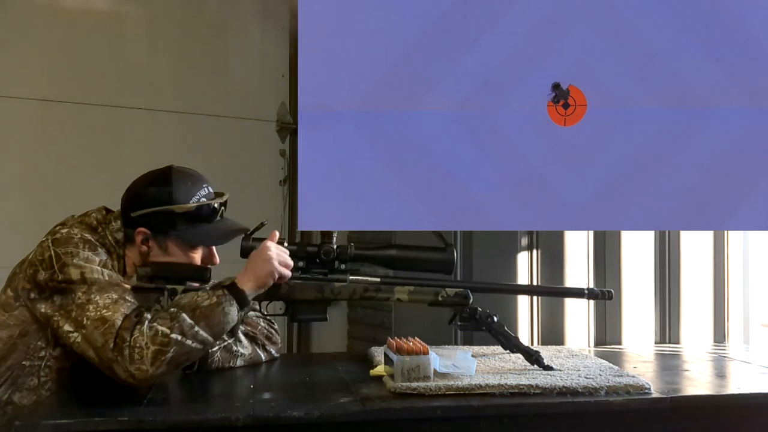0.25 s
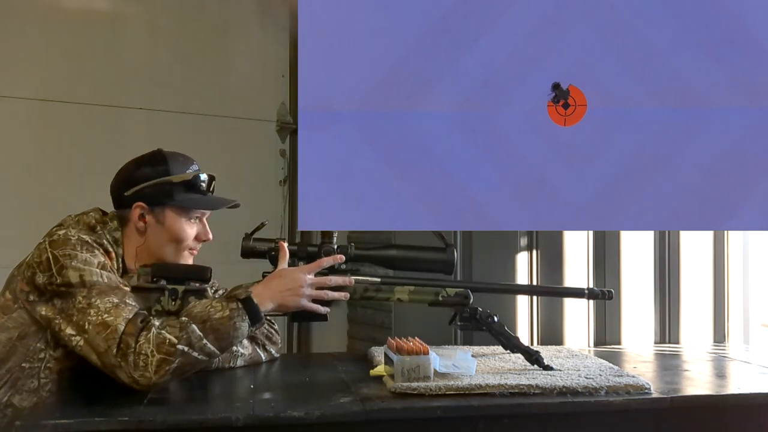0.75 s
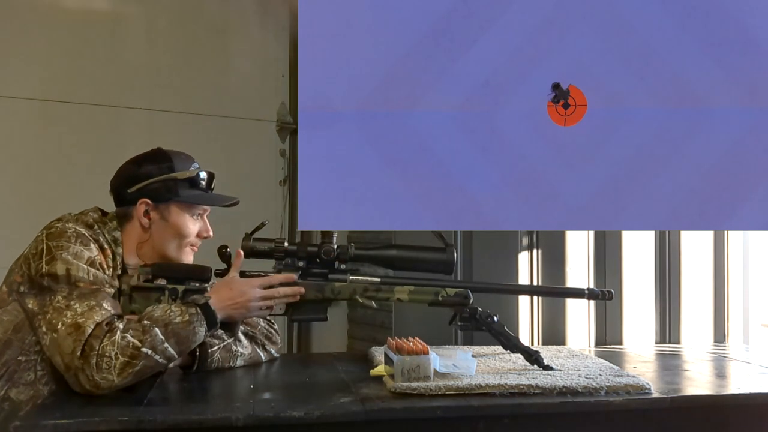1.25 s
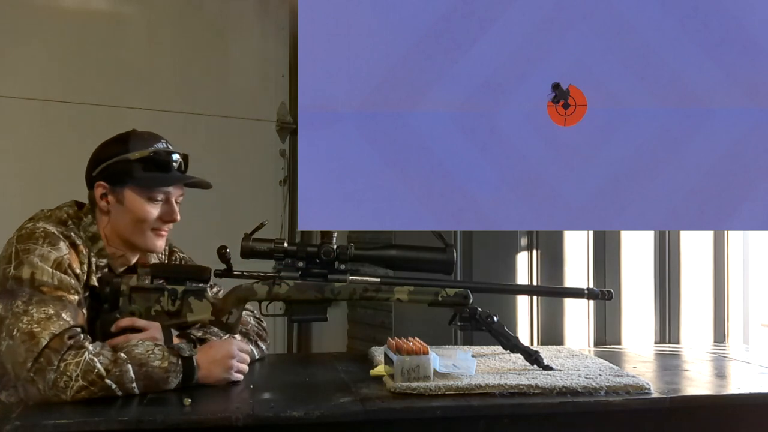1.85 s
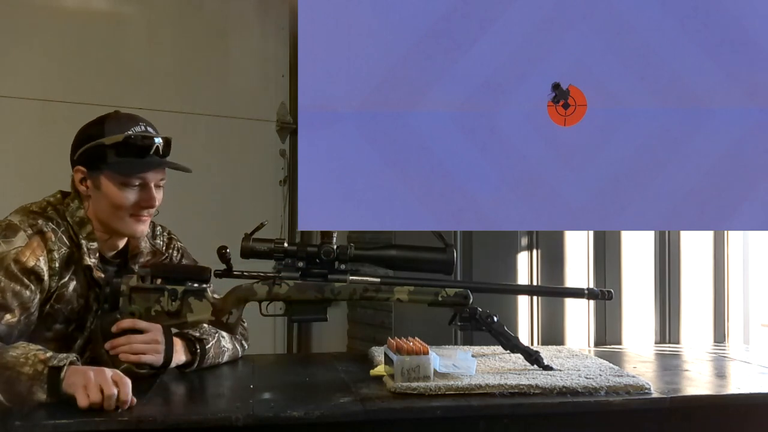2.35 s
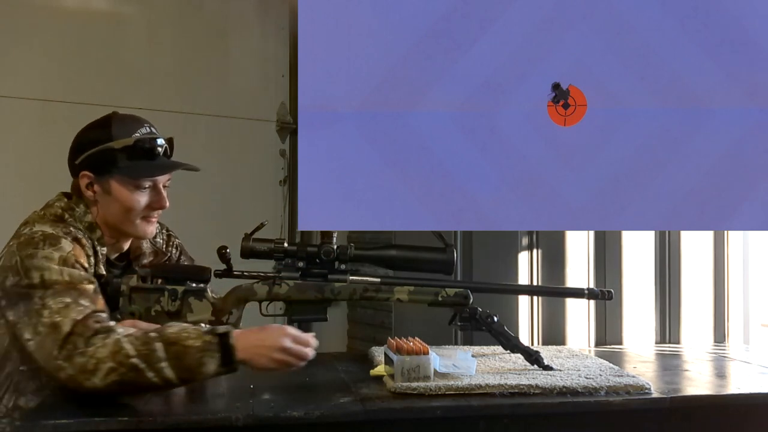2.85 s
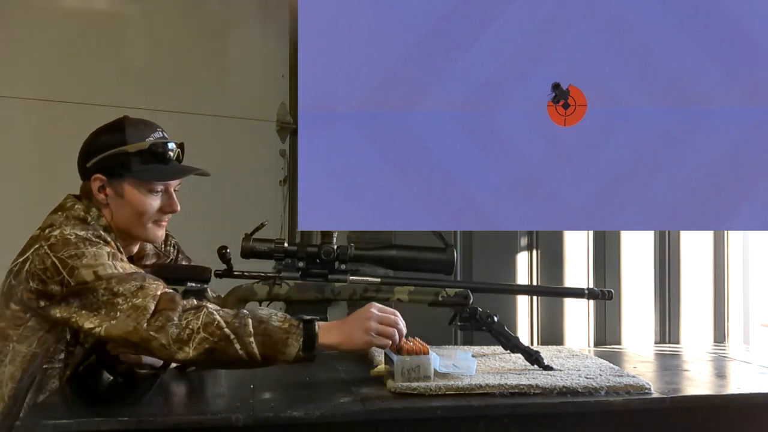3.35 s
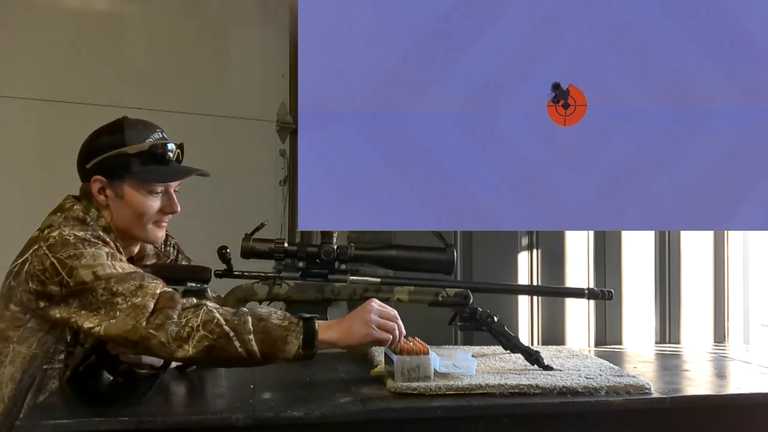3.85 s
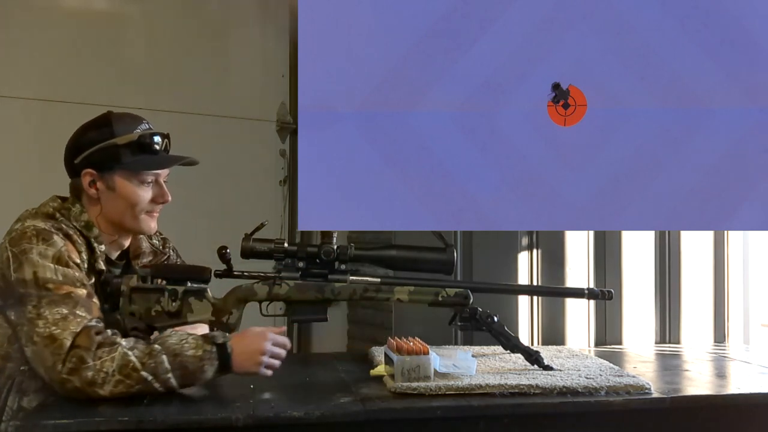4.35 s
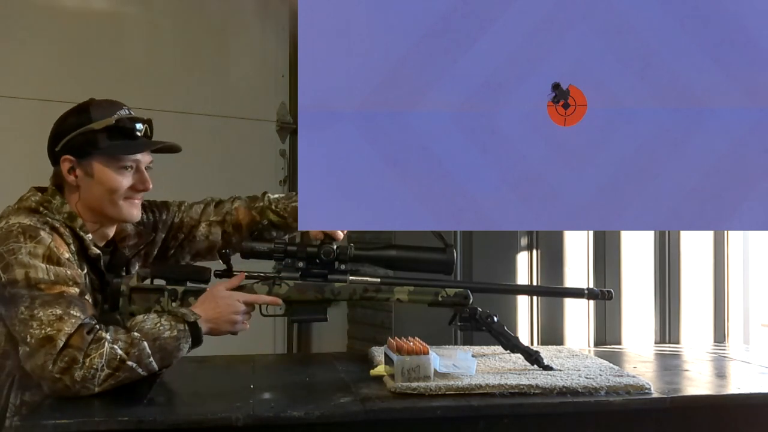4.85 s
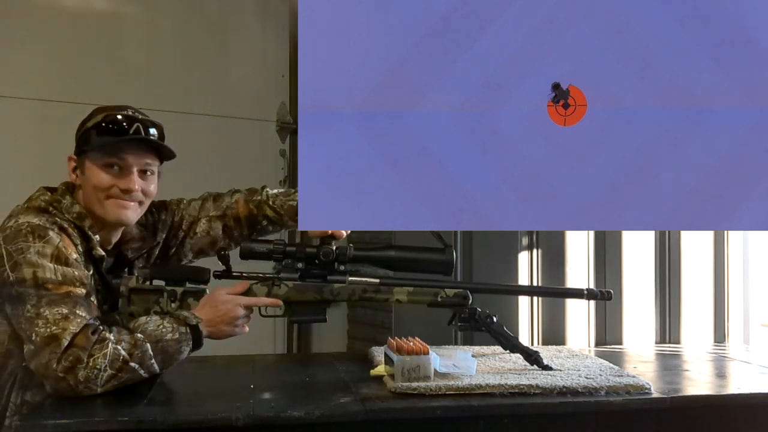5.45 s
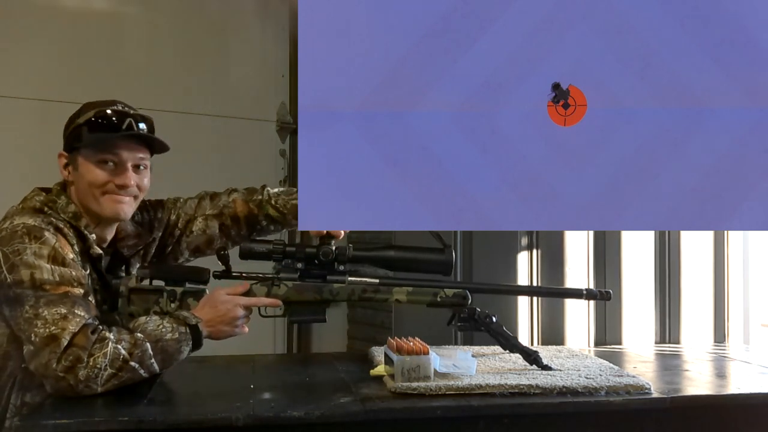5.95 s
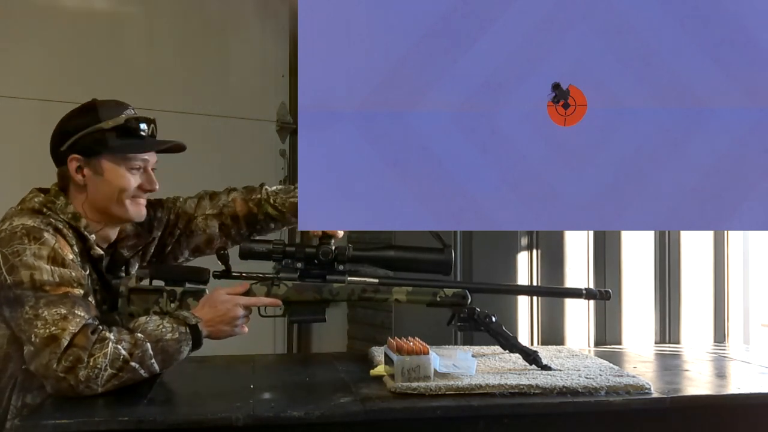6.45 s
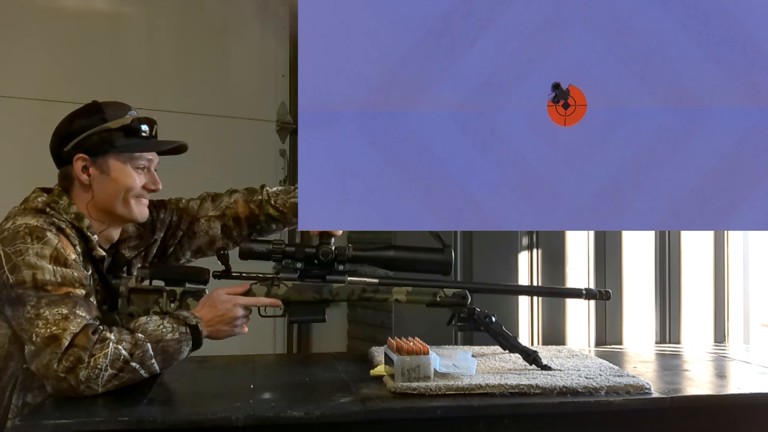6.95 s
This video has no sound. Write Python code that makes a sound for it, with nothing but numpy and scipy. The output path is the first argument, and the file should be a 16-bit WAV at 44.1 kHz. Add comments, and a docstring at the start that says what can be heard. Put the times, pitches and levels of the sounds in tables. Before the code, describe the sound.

A rifle shot's echo fades over a covered range, the bolt clacks back hard, and a spent brass case drops, bounces and rolls on the bench.

```python
"""First the echo of a rifle shot rolls away over a covered shooting range while the shelter's panels ring.
The bolt is lifted and pulled back against its stop, where it rebounds: steel, stock and bench ring at each blow.
The spent case lands on the bench, bounces and rolls: ringing brass, thuds, scuffs and a rain of tiny ticks.
Later cartridges rattle in their box, a scope dial turns click by click, and hands, arms and a sleeve rub and bump.
Hard walls add fading reflections made from noise, over quiet, still air."""
import sys
import numpy as np
from scipy import signal
from scipy.fft import rfft, irfft
from scipy.io import wavfile
from scipy.ndimage import uniform_filter1d

SR = 44100
rng = np.random.default_rng(int(sys.argv[2]) if len(sys.argv) > 2 else 0)


def store_pcm(level_fs):
    """Save levels as 16-bit WAV."""
    pcm = np.round(np.clip(level_fs, -1, 1) * 32767).astype(np.int16)
    wavfile.write(sys.argv[1], SR, np.atleast_2d(pcm).T)


N = 317074
T = np.arange(N) / SR  # time of each sample [s]
BLOW_SAMPLES = SR / 50  # 20 ms, the common yardstick for the energy of short sounds

# blows of the bolt; the steel rings first and the stock answers after a lag:
# (time [s], contact [s], steel level [dB], steel pitch ratio, crack level [dB],
#  stock lag [s], stock level [dB], stock pitch ratio, thud level [dB])
BOLT_BLOWS = [(.119, .014, -56, .93, -86.5, 0.0088, -41.5, 0.83, -65),
              (.362, .012, -46, 0.98, -56.5, .011, -38, 0.89, -48.5),
              (.425, .02, -60.5, 1.12, -80.5, 0.0045, -47.5, 0.62, -54.5),
              (.686, .009, -52.5, 0.9, -92.5, .006, -51, 0.97, -79),
              (1.198, .005, -36, 0.87, -42, .0005, -26, 0.88, -41.5),
              (1.2025, .012, -48.5, 1.1, -49.5, .0005, -20.5, 1.02, -41),
              (1.4195, .0055, -33, 1.01, -54, .002, -40.5, 0.81, -59.5)]
# ringing tones of the rifle stock: (frequency [Hz], level [dB], time to fall 60 dB [s])
STOCK_MODES = [(388, -17.5, 0.21), (614, -14.5, 0.085), (664, -2, 0.089), (728, -11.5, 0.11),
               (848.4, -9.5, 0.029), (940, -18, 0.16), (1470, -32.5, 0.059)]
# ringing tones of the bolt steel: (frequency [Hz], level [dB], time to fall 60 dB [s])
STEEL_MODES = [(1105, -2.5, 0.023), (1500, -10.5, .025), (1508, -3, 0.11), (1733.5, 2.5, .03),
               (1763, -7.5, .03), (2000, -11, .03), (2380, -22, .02)]
# colour of the hardest crack: (frequency [Hz], level [dB])
CRACK_COLOUR = [(120, -36.5), (500, -8.5), (1200, 11), (2200, 5), (2900, -2), (4300, -3.5), (4900, -13),
                (6000, -8), (7000, -6), (7700, -14), (9500, -21.5), (11000, -17), (11700, -59)]
# colour of a thud through the bench: (frequency [Hz], level [dB])
THUD_COLOUR = [(25, -30), (60, -23.5), (95, -12.5), (142, 1), (200, -5.5), (280, -6), (450, -20.5),
               (900, -36), (3000, -97.5)]
# colour of the bolt scraping back: (frequency [Hz], level [dB])
SLIDE_COLOUR = [(60, -11.5), (150, 7), (230, -7), (400, -11.5), (620, 5), (900, -3.5), (1250, -13),
                (1700, -2), (2400, -22.5), (4200, -24), (7000, -36.5), (9000, -43), (11100, -31.5),
                (11800, -74)]

# softer blows crack more dully: dB lost per octave above the knee for each dB under the hardest blow
CRACK_KNEE_HZ, CRACK_DULLING = 5165, 0.29
# the bolt rebounds from its stop, each time sooner and weaker; levels are those of the first rebound
REBOUND_S, REBOUND_GAP_S, REBOUND_SHRINK, REBOUND_LOSS_DB = 1.221, .018, .9, 5
REBOUND_STEEL_DB, REBOUND_CRACK_DB, REBOUND_STOCK_DB, REBOUND_THUD_DB = -47, -57.5, -27.5, -36.5
# the bolt slides back in its raceway: it gathers speed, runs on and is cut short by the stop
SLIDE_DB, SLIDE_FULL_S, SLIDE_ENDS_S = -37.5, 1.158, 1.202
SLIDE_RISE_DB_PER_S, SLIDE_SAG_DB_PER_S, SLIDE_DROP_DB_PER_S = 1100.5, 130.5, 1501.5

# the case hits the bench: (time [s], level [dB], contact [s])
LANDINGS = [(1.587, -20.5, 0.013), (1.604, -29, 0.007), (1.615, -31, 0.0076), (1.652, -36.5, .012),
            (1.695, -35.5, 0.0089), (1.709, -30, 0.021), (1.772, -34, 0.016), (1.827, -33, 0.012),
            (1.891, -39, .009), (1.919, -38.5, 0.012), (1.975, -42.5, 0.035), (2.138, -53, 0.026),
            (2.217, -49, 0.0075), (2.339, -58.5, 0.011)]
# ringing tones of brass on the bench top: (frequency [Hz], level [dB], time to fall 60 dB [s])
CASE_MODES = [(240, -24, 0.059), (445.4, -2, 0.072), (526, -13.5, .07), (610, 7, 0.051), (650, -6.5, 0.067),
              (783, 3, 0.028), (1040, -1, 0.17), (1068, -3.5, 0.17), (1126, -4, 0.14), (1366, -13.5, 0.11),
              (1420, -15.5, .1), (1590, -15, 0.15), (1693, -11.5, 0.11), (2000, -21, .1),
              (2125, -18, 0.046), (2430, -31.5, .08), (2400, -31.5, .04), (3560, -41.5, .05)]
# high tones of the thin brass wall, rung by the first, hardest landing:
# (frequency [Hz], level [dB], time to fall 60 dB [s])
BRASS_WALL_MODES = [(2440, -4.5, 0.12), (2500, -4.5, .04), (3570, -13, 0.12), (3987, -11.5, .012),
                    (4623, -18.5, .07)]
BRASS_WALL_DB = -49
# the case's last rock sets the rim singing: (time [s], level [dB], frequency [Hz], length [s])
LAST_ROCK = [(2.55, -60, 1080, 0.1)]
# colour of the rolling ticks: (frequency [Hz], level [dB])
ROLL_COLOUR = [(300, -0.5), (620, 10), (800, 8.5), (1000, 6.5), (1150, 2.5), (1350, -4), (1750, -4.5),
               (2100, -20), (2600, -28), (3300, -42), (4500, -50.5), (5500, -60), (9000, -85.5)]
# the roll surges as the case swings round: (time at the top [s], gain [dB], width [s])
ROLL_SURGES = [(2.145, 5.5, 0.012), (2.205, 9.5, 0.03), (2.325, 9, 0.038), (2.609, 15.5, 0.032)]
# the ejected case scuffs out of the port: (time [s], level [dB], length [s])
EJECTION = [(1.41, -41, 0.067), (1.45, -42.5, .15)]
# colour of brass scuffing on a hard surface: (frequency [Hz], level [dB])
SCUFF_COLOUR = [(300, -9), (600, 5.5), (1000, 9.5), (1800, 4.5), (2300, -6.5), (3400, -15), (4600, -24),
                (5200, -39.5), (7000, -46.5), (12000, -85.5)]

# the bench thuds under the landings, less as the hops get lower
LANDING_THUD_DB, LANDING_THUD_FADE_DB_PER_S = -44.5, 57.5
# every landing scuffs the bench: dB against its ring, length
LANDING_SCUFF_DB, LANDING_SCUFF_S = -13, .025
# the case rolls from its first landing on, slows and comes to rest
ROLL_DB, ROLL_RISE_DB_PER_S, ROLL_SAG_DB_PER_S = -30.5, 4001, 30.5
ROLL_ENDS_S, ROLL_DROP_DB_PER_S = 2.387, 134
# the lower edge of its sound climbs as it slows, most quickly round ROLL_THINS_S
ROLL_EDGE_HZ, ROLL_LAST_EDGE_HZ, ROLL_THINS_S, ROLL_THINNING_S = 340, 1400, 2.426, 0.1

# cartridges knock in their box: (time [s], box level [dB], brass clink level [dB], bench knock level [dB])
RATTLE = [(4.119, -63.5, -63.5, -90), (4.144, -58.5, -68.5, -92), (4.1905, -49.5, -49.5, -73),
          (4.202, -46, -57, -48), (4.211, -44.5, -57.5, -47.5), (4.244, -49.5, -64, -68),
          (4.256, -46.5, -61.5, -56.5), (4.278, -50.5, -68, -54), (4.305, -50.5, -67, -61)]
# ringing tones of the cartridge box: (frequency [Hz], level [dB], time to fall 60 dB [s])
BOX_MODES = [(574, -15, 0.07), (687, 5, 0.16), (787, 16, 0.052), (863, 11.5, 0.074), (983, 10.5, 0.048),
             (1210, 9, 0.018), (1513, 0, 0.08), (1708, 0.5, 0.12), (2080, -41, .03), (2450, -23, .02)]
# colour of brass clinking on brass: (frequency [Hz], level [dB])
CLINK_COLOUR = [(300, -16), (900, 1), (1400, 3.5), (1900, 4.5), (2300, -7.5), (2700, -13.5), (3600, -23.5),
                (4500, -31), (4900, -44), (8000, -70)]
# ringing tones of the bench under the box: (frequency [Hz], level [dB], time to fall 60 dB [s])
BENCH_MODES = [(307, -11, 0.079), (442, -5, 0.074), (534, 7.5, 0.028)]
# the cartridges settle in a run of weaker, duller knocks
SETTLE_S, SETTLE_GAP_S, SETTLE_DB, SETTLE_LOSS_DB, SETTLE_TOP_HZ = 4.325, 0.03, -60, 7.5, 1700

# a scope dial turned one click at a time:
# (time [s], click level [dB], pitch ratio, rub level [dB], bump level [dB])
DIAL_CLICKS = [(5.167, -58, 1.016, -66.5, -54.5), (5.654, -63.5, 0.92, -64, -56.5),
               (6.169, -53.5, 1, -63.5, -66), (6.72, -59, 1.0, -69, -61)]
# the detent gives with a chatter, then drops home a moment later and more softly
DETENT_S, DETENT_HOME_S, DETENT_HOME_DB = 0.018, .021, -7
# the detent's steel adds a bright tick: dB against the click
DETENT_TICK_DB = -12
# before each click the fingers rub on the dial and press the rifle against the bench
GRIP_LEAD_S, GRIP_S = .12, 0.15
PRESS_LEAD_S, PRESS_S, PRESS_HZ = 0.045, 0.075, 141.3

# light taps of fingers on the gear: (time [s], level [dB], contact [s], pitch ratio)
FINGER_TAPS = [(2.966, -69, 0.01, 1.21), (3.028, -75.5, 0.006, 1.17), (3.599, -76.5, .0072, 1.12),
               (3.998, -73, .0074, 1.2), (7.046, -63.5, .021, 0.74)]
# ringing tones of the gear's casing: (frequency [Hz], level [dB], time to fall 60 dB [s])
GEAR_MODES = [(669.4, 4.5, 0.12), (708, 1, 0.17), (808, 0, 0.081), (800, -11.5, 0.018), (1176, -6, 0.12),
              (1528, -9, 0.067), (1720, -6, 0.038), (2680, -18, 0.096)]
# hands rub over the gear, and a fuller knock near 2.96 s sounds as a short stroke: (time [s], level [dB],
# length [s])
HAND_RUBS = [(2.71, -79, 0.073), (2.85, -72, 0.073), (2.956, -64, 0.051), (4.09, -66, 0.064),
             (5.8, -73.5, 0.17), (6.42, -64, 0.11), (7.0, -57.5, 0.1)]
# colour of a rubbing hand: (frequency [Hz], level [dB])
RUB_COLOUR = [(300, -19.5), (480, -12), (590, 6), (720, 0), (860, 0.5), (1030, -8.5), (1220, -5.5),
              (1480, -18), (1850, -11), (2200, -31), (3200, -35), (5000, -52)]
# the sleeve brushes past: (time [s], level [dB], length [s])
SLEEVE_SWISHES = [(1.916, -66.5, 0.078), (2.212, -88, 0.076), (2.534, -75.5, 0.12), (6.431, -83, 0.077)]
# colour of the sleeve: (frequency [Hz], level [dB])
SLEEVE_COLOUR = [(1500, -4.5), (3200, -1.5), (4200, 2), (5200, -12), (6000, -8.5), (7200, -10),
                 (8200, -54.5), (12000, -50)]
# arms bump the bench: (time [s], level [dB], frequency [Hz], length [s])
ARM_BUMPS = [(2.96, -69, 417, 0.039), (3.025, -62, 345, 0.025), (4.535, -62, 312, 0.042),
             (4.54, -64, 147, 0.029), (4.886, -55, 374, 0.048), (7.05, -58.5, 409, .03),
             (7.052, -65, 229, 0.038)]

# colour of the shot's echo: (frequency [Hz], level [dB])
ECHO_COLOUR = [(100, -18.5), (280, -24.5), (350, -2), (420, 1.5), (480, -3.5), (600, -10.5), (780, -9.5),
               (900, -1), (1020, -15.5), (1120, -30.5), (1800, -40.5), (2400, -64), (5000, -83)]
# shelter panels still ringing from the blast: (frequency [Hz], level at start [dB], time to fall 60 dB [s])
PANEL_MODES = [(355, -54, 16), (714, -55.5, 3), (890, -50.5, 1.8), (883, -70, 2.5), (1130, -81.5, 3)]
# late dull returns from far off, all at one pitch: (time [s], level [dB], length [s])
FAR_RETURNS = [(0.175, -48, 0.034), (0.261, -46, 0.024), (0.875, -52, 0.019), (0.891, -50, 0.055),
               (0.929, -50.5, .055), (0.969, -55, 0.043), (1.024, -64, 0.017)]
RETURN_HZ = 369.8
# the echo sinks slowly, then drops away once the farthest slopes have answered
ECHO_DB, ECHO_SAG_DB_PER_S, ECHO_ENDS_S, ECHO_DROP_DB_PER_S = -48, 7, .71, 57.5

# reverberation of the range: (frequency [Hz], time to fall 60 dB [s], level [dB])
ROOM_DECAY = [(100, .4, -3.5), (249, 0.57, 1), (450, 0.47, -4), (810, .93, 2), (1389, 0.55, -2),
              (2960, 0.42, -1.5), (5920, 0.39, -1.5), (11090, 0.55, -8)]
# colour of the still air: (frequency [Hz], level [dB])
AIR_COLOUR = [(20, 9), (45, 0), (80, -2), (108, 4), (140, -7.5), (270, -13), (360, -12), (560, -12.5),
              (680, -19), (950, -21), (1300, -30), (1750, -28.5), (2400, -38.5), (4000, -41), (15500, -44)]
AIR_DB = -67.5
TOP_HZ = 15700  # upper limit of the finished sound


def bolt():
    """Each blow cracks, rings steel and stock, and thuds; a dense rain of contacts scrapes as the bolt slides."""
    body, steel, crack = np.zeros((3, N))
    for (s, length, steel_db, steel_ratio, crack_db,
         lag, stock_db, stock_ratio, thud_db) in list(BOLT_BLOWS) + rebounds():
        add(steel, s, undb(steel_db) * strike(STEEL_MODES, length, steel_ratio, top_hz=2100))
        add(crack, s, undb(crack_db) * blow(tint(contact(length), crack_colour(crack_db))))
        add(body, s + lag, undb(stock_db) * strike(STOCK_MODES, 0.007, stock_ratio, top_hz=1510))
        add(body, s + lag, undb(thud_db) * blow(tint(contact(0.014), THUD_COLOUR)))
    slide_db = SLIDE_DB + envelope(SLIDE_FULL_S, SLIDE_ENDS_S, SLIDE_SAG_DB_PER_S,
                                   SLIDE_DROP_DB_PER_S, SLIDE_RISE_DB_PER_S)
    scrape = unit(tint(grains(6600, 0.86), SLIDE_COLOUR)[:N]) * undb(slide_db)
    return body, steel, crack + scrape


def rebounds(count=4):
    """The bolt's bounces off its stop lose strength and follow faster; they are returned as further blows."""
    s, rows = REBOUND_S, []
    for k in range(count):
        loss = k * REBOUND_LOSS_DB
        rows.append((s, .012, REBOUND_STEEL_DB - loss, 1.1, REBOUND_CRACK_DB - loss,
                     .001, REBOUND_STOCK_DB - loss, 1, REBOUND_THUD_DB - loss))
        s += REBOUND_GAP_S * REBOUND_SHRINK ** k
    return rows


def crack_colour(crack_db):
    """The spectrum of a crack: a softer blow excites less treble."""
    softer = max(row[4] for row in BOLT_BLOWS) - crack_db
    return [(hz, db - CRACK_DULLING * softer * max(np.log2(hz / CRACK_KNEE_HZ), 0))
            for hz, db in CRACK_COLOUR]


def spent_case():
    """Each landing rings the brass and thuds through the bench; the case also rolls and its rim sings."""
    out = rolling_case() + swells(LAST_ROCK, spread=.5)
    for s, db, length in LANDINGS:
        thud_db = LANDING_THUD_DB - LANDING_THUD_FADE_DB_PER_S * (s - LANDINGS[0][0])
        add(out, s, undb(db) * strike(CASE_MODES, length, top_hz=2320))
        add(out, s, undb(thud_db) * blow(tint(contact(0.024), THUD_COLOUR)))
    return out


def rolling_case():
    """The rim ticks over the bench and rings the case; the sound thins as it presses less."""
    ticks = grains(2200, 0.69)
    ringing = signal.fftconvolve(ticks, ring(CASE_MODES))[:N]
    band = signal.butter(4, [300, 2400], "band", fs=SR, output="sos")
    ringing = signal.sosfilt(band, ringing)
    source = unit(tint(ticks, ROLL_COLOUR)[:N]) + undb(-9.5) * unit(ringing)
    # split into short frames so that the lower edge can climb with time
    hz, s, frames = signal.stft(source, SR, nperseg=SR // 86)
    progress = 1 / (1 + np.exp((ROLL_THINS_S - s) / ROLL_THINNING_S))
    edge = ROLL_EDGE_HZ + (ROLL_LAST_EDGE_HZ - ROLL_EDGE_HZ) * progress
    thinning = 1 - 1 / (1 + (hz[:, None] / edge) ** 6)
    rolling = signal.istft(frames * thinning, SR)[1][:N]
    # even out the loudness before shaping it
    rolling /= np.sqrt(uniform_filter1d(rolling ** 2, SR // 10))
    roll_db = ROLL_DB + envelope(LANDINGS[0][0] + 0.004, ROLL_ENDS_S, ROLL_SAG_DB_PER_S,
                                 ROLL_DROP_DB_PER_S, ROLL_RISE_DB_PER_S)
    surge_db = sum(db * np.exp(-((T - top) / width) ** 2) for top, db, width in ROLL_SURGES)
    # the rim is not quite round, so the roll throbs unevenly
    return rolling * undb(roll_db + surge_db + 0.99 * walk(66))


def brass_ring():
    """The first landing briefly rings the high tones of the thin brass wall."""
    out = np.zeros(N)
    add(out, LANDINGS[0][0], undb(BRASS_WALL_DB) * strike(BRASS_WALL_MODES, 0.028, top_hz=4500))
    return out


def scuffs():
    """Brass slips in tiny jerks as the case leaves the port and chatters at each landing."""
    out = strokes(EJECTION, SCUFF_COLOUR)
    for s, db, _ in LANDINGS:
        add(out, s, undb(db + LANDING_SCUFF_DB) * blow(tint(contact(LANDING_SCUFF_S), SCUFF_COLOUR)))
    return out


def cartridges(count=3):
    """Rounds clink against each other and knock on the box and the bench under it, then settle."""
    out = np.zeros(N)
    for s, box_db, clink_db, knock_db in RATTLE:
        ratio = 1 + .06 * rng.standard_normal()  # each knock rings the box at a slightly different pitch
        add(out, s, undb(box_db) * strike(BOX_MODES, .009, ratio, top_hz=2420))
        add(out, s, undb(clink_db) * blow(tint(contact(0.01), CLINK_COLOUR)))
        add(out, s, undb(knock_db) * strike(BENCH_MODES, 0.0074, top_hz=820))
    for k in range(count):
        knock = strike(BOX_MODES, .018, top_hz=SETTLE_TOP_HZ)
        add(out, SETTLE_S + k * SETTLE_GAP_S, undb(SETTLE_DB - k * SETTLE_LOSS_DB) * knock)
    return out


def scope_dial():
    """For each step the fingers grip and press, then the detent clicks twice and rings the casing."""
    out = np.zeros(N)
    for s, db, ratio, _, _ in DIAL_CLICKS:
        home_db = db + DETENT_HOME_DB
        add(out, s, undb(db) * strike(GEAR_MODES, DETENT_S, ratio, top_hz=1300))
        add(out, s, undb(db + DETENT_TICK_DB) * strike(STEEL_MODES, 0.018, 1.1, top_hz=2200))
        add(out, s + DETENT_HOME_S, undb(home_db) * strike(GEAR_MODES, DETENT_S, ratio, top_hz=1900))
    grips = [(s - GRIP_LEAD_S, rub_db, GRIP_S) for s, _, _, rub_db, _ in DIAL_CLICKS]
    presses = [(s - PRESS_LEAD_S, bump_db, PRESS_HZ, PRESS_S) for s, _, _, _, bump_db in DIAL_CLICKS]
    return out + strokes(grips, RUB_COLOUR) + swells(presses, spread=0.5)


def handling():
    """Finger taps ring the gear's casing; rubbing hands and a brushing sleeve make many tiny slips."""
    out = np.zeros(N)
    for s, db, length, ratio in FINGER_TAPS:
        add(out, s, undb(db) * strike(GEAR_MODES, length, ratio, top_hz=2600))
    return out + strokes(HAND_RUBS, RUB_COLOUR) + strokes(SLEEVE_SWISHES, SLEEVE_COLOUR)


def arm_bumps():
    """Arms bump the bench in dull, blurred pulses."""
    return swells(ARM_BUMPS, spread=0.77)


def shot_echo():
    """The land throws the shot back in scattered lumps while the shelter's panels ring out."""
    echo_db = ECHO_DB + envelope(0, ECHO_ENDS_S, ECHO_SAG_DB_PER_S, ECHO_DROP_DB_PER_S)
    scatter = noise(ECHO_COLOUR) * undb(echo_db + 1.9 * walk(40))
    panels = np.zeros(N)
    for hz, db, t60 in PANEL_MODES:
        level = undb(db - 60 * T / t60 + 3.2 * walk(12))
        panels += level * np.sin(2 * np.pi * hz * T + .5 * walk(38))
    fade = 1 / (1 + (T / .92) ** 12)
    returns = [(s, db, RETURN_HZ, length) for s, db, length in FAR_RETURNS]
    return scatter + panels * fade + swells(returns, spread=0.14)


def room(x):
    """Hard walls send back diffuse reflections; every half octave dies at its own rate."""
    t = T[:SR]
    hz, t60, db = np.transpose(ROOM_DECAY)
    octaves = np.log2(np.maximum(np.fft.rfftfreq(SR, 1 / SR), 1))
    reflections, response = rfft(rng.standard_normal(SR)), 0
    for centre in np.arange(6, 14.5, .5):
        band = irfft(reflections * np.maximum(1 - 2 * np.abs(octaves - centre), 0))
        decay = np.interp(centre, np.log2(hz), t60) / np.log(1000)
        gain = undb(np.interp(centre, np.log2(hz), db)) * np.sqrt(2 / (decay * SR))
        response = response + band * np.exp(-t / decay) * gain
    build_up = 1 - np.exp(-t / 0.019)
    return signal.fftconvolve(x, response * build_up)[:N]


def still_air():
    """Quiet coloured noise whose level wavers slightly."""
    return noise(AIR_COLOUR) * undb(AIR_DB + .5 * walk(4))


def strike(modes, length, ratio=1, top_hz=4500):
    """A contact rings a set of modes; it is too soft to reach above top_hz."""
    # small things radiate little below their lowest mode
    edges = [.55 * modes[0][0], min(top_hz, SR / 3)]
    band = signal.butter(4, edges, "band", fs=SR, output="sos")
    return blow(signal.sosfilt(band, signal.fftconvolve(contact(length), ring(modes, ratio))))


def contact(length):
    """The chattering force of one contact: a quick rise, a decay, and an even spectrum."""
    age = T[:8192] / length
    shape = np.sqrt(age) * np.exp(-2 * age)
    force = rng.standard_normal(len(age)) * shape
    # in turn, level the spectrum and restore the shape in time
    for _ in range(4):
        force = irfft(np.exp(1j * np.angle(rfft(force)))) * np.sqrt(shape)
    return force


def ring(modes, ratio=1):
    """The free ring of a set of modes; dB is each mode's share of the energy."""
    t = T[:SR // 3]
    out = np.zeros(len(t))
    for turn, (hz, db, t60) in enumerate(modes, 1):
        decay = np.exp(-np.log(1000) * t / t60)
        # turn starts each mode at a different phase
        out += undb(db) / np.sqrt(t60) * np.cos(2 * np.pi * hz * ratio * t + turn) * decay
    return out


def strokes(rows, colour):
    """Brief rubs: tiny slips that swell and fade."""
    out, slips = np.zeros(N), tint(grains(3500, 2.9), colour)
    for s, db, length in rows:
        window = np.hanning(int(length * SR))
        add(out, s, undb(db) * blow(window * slips[int(s * SR):][:len(window)]))
    return out


def swells(rows, spread):
    """Sounds that swell and die: a few cycles round one pitch, blurred by noise."""
    out = np.zeros(N)
    for s, db, hz, length in rows:
        t = T[:int(length * SR)]
        colour = [(hz / 4, -30), (hz / 2, -14), (hz, 0), (hz * 2, -18), (hz * 8, -70)]
        blur = noise(colour)[:len(t)]
        tone = np.sin(2 * np.pi * hz * t)
        add(out, s, undb(db) * blow(np.sin(np.pi * t / length) * (tone + spread * blur)))
    return out


def grains(rate, scatter_db):
    """A dense rain of tiny contacts of uneven size, rate per second."""
    hits = rng.random(N) < rate / SR
    return hits * rng.standard_normal(N) * undb(scatter_db * rng.standard_normal(N))


def noise(colour):
    """Steady coloured noise, rms 1."""
    return unit(tint(rng.standard_normal(N), colour)[:N])


def tint(x, colour):
    """Filter with a (frequency [Hz], level [dB]) spectrum that never acts ahead of its input."""
    size = 8192
    hz, db = np.transpose(colour)
    grid = np.maximum(np.fft.rfftfreq(size, 1 / SR), 1)
    # folding the cepstrum of the log gain onto positive time makes the filter causal
    cepstrum = irfft(np.log(undb(np.interp(np.log(grid), np.log(hz), db))))
    cepstrum[1:size // 2] *= 2
    cepstrum[size // 2 + 1:] = 0
    return signal.fftconvolve(x, irfft(np.exp(rfft(cepstrum))))


def envelope(start, end, sag_db_per_s, drop_db_per_s, rise_db_per_s=0):
    """Level in dB: it rises to 0 at start, sags until end and then drops away."""
    rise = rise_db_per_s * np.maximum(start - T, 0)
    sag = sag_db_per_s * np.clip(T - start, 0, end - start)
    drop = drop_db_per_s * np.maximum(T - end, 0)
    return -rise - sag - drop


def walk(rate):
    """A random wander with a spread near 1: straight lines between rate random points a second."""
    knots = rng.standard_normal(1024)
    return np.interp(T * rate, np.arange(len(knots)), knots)


def undb(db):
    """Decibels to gain."""
    return 10 ** (np.asarray(db) / 20)


def unit(x):
    """Scale to rms 1."""
    return x / np.sqrt(np.mean(x ** 2))


def blow(x):
    """Scale a short sound to the energy of 20 ms at rms 1."""
    return x * np.sqrt(BLOW_SAMPLES / np.sum(x ** 2))


def add(out, s, x):
    """Mix a short sound in at time s."""
    start = max(int(s * SR), 0)
    out[start:start + len(x)] += x[:N - start]


def scene():
    """The sources near the bench, most with a share of the room, with the shot's echo over still air."""
    body, steel, crack = bolt()
    case = spent_case() + scuffs()
    box = cartridges()
    gear = handling() + scope_dial()
    rifle_send = undb(-2.5) * body + undb(-1) * steel + undb(3.5) * crack
    bench_send = undb(-4.5) * case + undb(1.0) * box + undb(-8.5) * gear
    reflections = room(rifle_send + bench_send)
    direct = body + steel + crack + case + brass_ring() + box + gear + arm_bumps()
    return (shot_echo() + direct + reflections + still_air())[None]


def record(dry):
    """A steep low-pass filter cuts the top of the treble."""
    return signal.sosfilt(signal.ellip(8, .2, 70, TOP_HZ, fs=SR, output="sos"), dry)


dry = scene()
out = record(dry)
store_pcm(out)
```